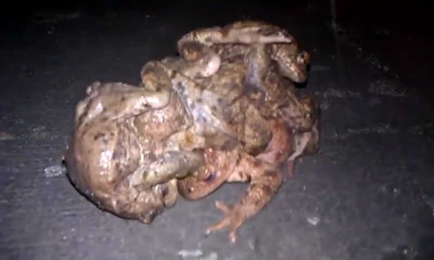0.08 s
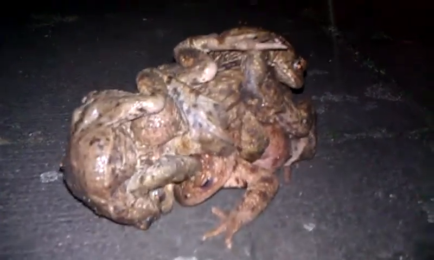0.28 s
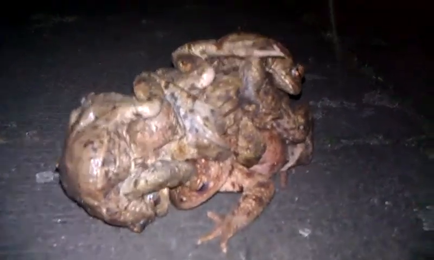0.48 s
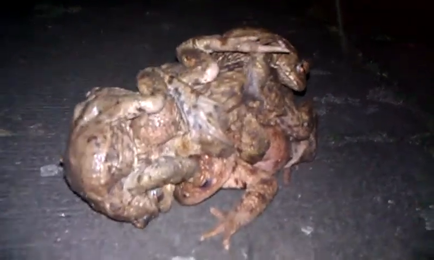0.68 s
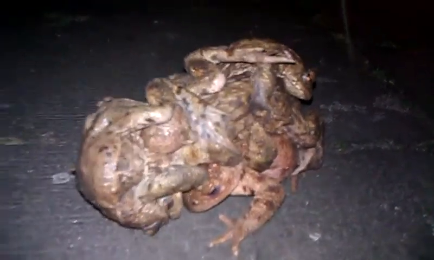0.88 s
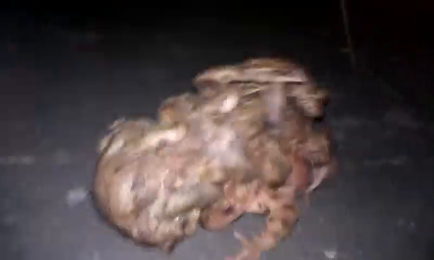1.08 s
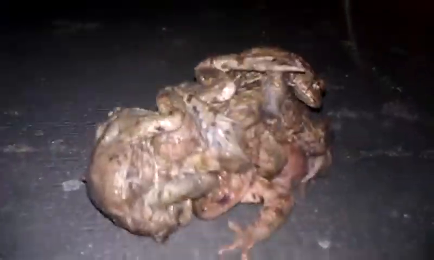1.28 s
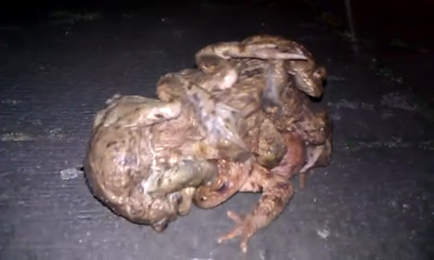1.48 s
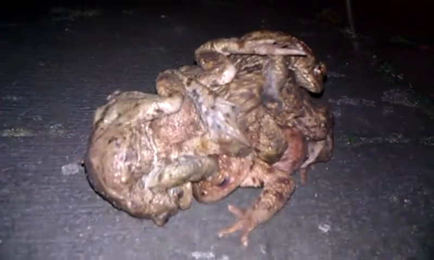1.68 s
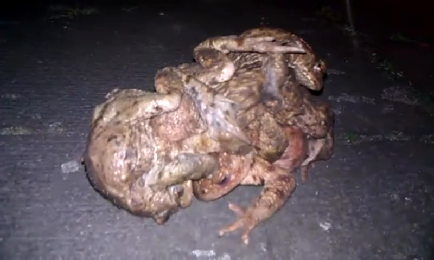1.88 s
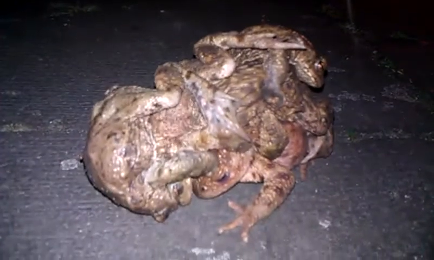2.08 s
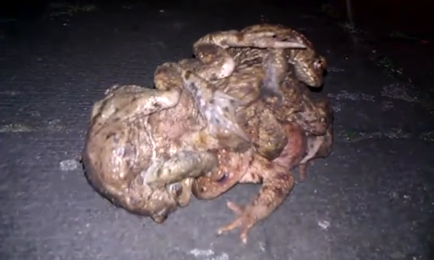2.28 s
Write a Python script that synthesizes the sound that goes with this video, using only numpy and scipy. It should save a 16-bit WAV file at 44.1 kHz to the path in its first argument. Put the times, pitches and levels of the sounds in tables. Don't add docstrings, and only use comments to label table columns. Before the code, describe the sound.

First a crisp cloth swish close to the phone, then a short toad chirp with sharp fabric cracks, and two more stuttering chirps, outdoors on a quiet night with faint engine hum and hiss.

```python
import sys
import numpy as np
from scipy import signal
from scipy.io import wavfile
from scipy.ndimage import uniform_filter1d

SR = 44100
rng = np.random.default_rng(int(sys.argv[2]) if len(sys.argv) > 2 else 0)


def materialize(psi):
    bounded = np.clip(np.atleast_2d(psi).T, -1, 1)
    quanta = np.round(bounded * 32767).astype(np.int16)
    wavfile.write(sys.argv[1], SR, quanta)


def ratio(d):
    e = np.asarray(d, float) / 20
    return 10 ** e


N = 101430

# frequency in Hz, level in dB per Hz.
NIGHT_AIR = [(25, -36), (60, -7.5), (130, -11), (370, -16.5), (1160, -17.5), (1900, -25), (8000, -33),
             (16000, -35)]
# time in seconds, level in dB.
ENGINE_HUM = [(0, -65), (.8, -65), (1.35, -60), (1.5, -59), (1.9, -63.5), (2.3, -69)]
# start in seconds, length in seconds, level in dB, pitch in Hz.
FAR_CALLS = [
    (0.661, 0.24, -65, 1535),
    (1.855, 0.014, -56.5, 1300),
    (2.095, 0.015, -56, 1100),
]
# time in seconds, level in dB, brightness in dB.
SWISH_PATH = [(.212, -55.5, -6), (.229, -43, -5), (.233, -26.5, -2), (.246, -24, 3.5), (.268, -35, -5),
              (.339, -45, -11), (.479, -40.5, -3.5), (.6, -50, -28), (.65, -77, -4)]
# time in seconds, level in dB, brightness in dB.
SHIFT_PATH = [(.79, -63, -38), (.807, -53.5, -35), (.810, -45, -33), (.832, -61, -33), (.865, -59.5, -33),
              (.89, -46.5, -33), (.898, -37.5, -29), (.918, -45.5, -33), (.94, -47, -33)]
# time in seconds, level in dB, brightness in dB.
TUG_PATH = [(.955, -58, -25), (.972, -34.5, -20), (.985, -43.5, -32), (.994, -41, -33), (1.005, -54, -25),
            (1.07, -75, -25)]
# frequency in Hz, width in Hz, level in dB.
WEAVE_RINGS = [(3320, 1210, -14), (5720, 960, 0), (6500, 1330, -1), (7880, 2500, -12), (11520, 2350, -11)]
# frequency in Hz, width in Hz, level in dB.
FOLD_RINGS = [(3700, 2600, -2.5), (5000, 2600, 7), (6470, 1400, 7), (8800, 1200, -6)]
# frequency in Hz, width in Hz, level in dB.
SHEEN_RINGS = [(3500, 140, -6.5), (7520, 1700, 13.5), (10500, 1400, -21), (12970, 2300, 8.5),
               (14060, 1900, 2.5)]
# time in seconds, peak in dB, centre in Hz, low thump in dB.
CLOTH_SNAPS = [
    (0.2136, -31.5, 5560, -40),
    (0.2314, -16.5, 5700, -39),
    (.72, -46, 5000, -33),
    (0.809, -43, 6200, -40),
    (0.9693, -18, 6500, -30.5),
    (0.9863, -25, 5740, -36),
    (0.99, -10, 5540, -23),
]
# start in seconds, held time in seconds, level in dB, pitch in Hz,
# share of the pitch by which it starts sharp.
CORD_BURSTS = [(0.921, 0.0012, -22, 1148, 0.22), (0.929, 0.0035, -24, 1158, 0.083),
               (0.9369, .045, -23, 1085, 0.03), (1.2737, 0.00017, -21.5, 1140, 0.44),
               (1.281, 0.0008, -23.5, 1280, 0.26), (1.289, 0.0014, -20.5, 1156, 0.14),
               (1.2971, 0.0024, -20.5, 1161, 0.13), (1.304, 0.0035, -21.5, 1144, 0.04),
               (1.3108, .042, -21, 1084, 0.082), (1.989, 0.0002, -18.5, 1215, 0.18),
               (1.995, 0.0009, -19, 1120, 0.14), (2.0023, 0.0033, -21, 1157, 0.13),
               (2.009, .035, -20, 1104, 0.12)]
# frequency in Hz, level in dB.
THROAT_CURVE = [(2200, -18), (4400, -21.5), (7500, -33), (9700, -32), (10800, -18), (11900, -33),
                (13500, -21), (15200, -15)]


def unit(x):
    return x / np.sqrt(np.mean(x ** 2))


def ring(x, hz, width):
    centre = min(hz, 0.45 * SR)
    b, a = signal.iirpeak(centre, max(hz / width, 0.3), fs=SR)
    return signal.lfilter(b, a, x)


def ring_twice(x, hz, width):
    return ring(ring(x, hz, width), hz, width)


def walk(rate, n=N):
    k = max(int(SR / rate), 1)
    held = np.repeat(rng.standard_normal(n // k + 1), k)
    return 2.03 * uniform_filter1d(uniform_filter1d(held, k), k)[:n]


def add(out, s, x):
    i = int(s * SR)
    out[i:i + len(x)] += x[:N - i]


def night():
    air = 0
    air_hz, air_db = np.array(NIGHT_AIR).T
    for hz in 35 * 2 ** np.arange(0, 9.4, 0.5):
        per_hz = np.interp(np.log(hz), np.log(air_hz), air_db)
        db = per_hz + 10 * np.log10(hz) + 1.35 * walk(6.96)
        air = air + ratio(db) * unit(ring_twice(rng.standard_normal(N), hz, hz / 2))
    hum_s, hum_db = np.array(ENGINE_HUM).T
    hum_level = ratio(np.interp(np.arange(N) / SR, hum_s, hum_db))
    hum = hum_level * unit(ring(rng.standard_normal(N), 56, 9.8))
    hiss = ratio(-68) * unit(ring(rng.standard_normal(N), 5900, 1470))
    return ratio(-57) * unit(air) + hum + hiss


def far_toads():
    out = np.zeros(N)
    for s, length, db, hz in FAR_CALLS:
        n = int(length * SR)
        note = unit(ring_twice(rng.standard_normal(n), hz, 45))
        add(out, s, ratio(db) * np.sqrt(np.hanning(n)) * note)
    return out


def cloth_tone(clicks, resonances):
    tone = 0
    for hz, width, db in resonances:
        flicker = ratio(db + 1.2 * walk(150))
        tone = tone + flicker * ring_twice(clicks, hz, 0.98 * width)
    return unit(tone)


def sleeve(path, weave, clicks_per_s):
    t = np.arange(N) / SR
    s, db, bright_db = np.array(path).T
    struck = rng.random(N) < clicks_per_s / SR
    grain = ratio(2.0 * rng.exponential(size=N))
    clicks = struck * grain * rng.standard_normal(N)
    no_lows = signal.butter(6, 2300, "high", fs=SR, output="sos")
    clicks = signal.sosfilt(no_lows, clicks)
    level = ratio(np.interp(t, s, db, -120, -120))
    bright = ratio(np.interp(t, s, bright_db))
    return level * (cloth_tone(clicks, weave) + bright * cloth_tone(clicks, SHEEN_RINGS))


def snaps():
    SNAP_S, THUMP_HZ, THUMP_S = 0.0015, 500, 0.003
    out = np.zeros(N)
    t = np.arange(SR // 30) / SR
    for s, db, hz, thump_db in CLOTH_SNAPS:
        burst = rng.standard_normal(len(t)) * np.exp(-t / SNAP_S)
        width = 0.43 * hz
        edge = ratio(-31) * np.diff(burst, prepend=0)
        crack = ring(ring(burst, hz, width), hz, 2 * width) + edge
        thump = 2 * t / THUMP_S * np.exp(-2 * t / THUMP_S)
        knock = ratio(thump_db) * thump * np.sin(2 * np.pi * THUMP_HZ * t)
        add(out, s, ratio(db) * (crack / np.abs(crack).max() + 3 * knock))
    return out


def toad():
    KICK_S, SAG_HZ_PER_S, JITTER = 0.0023, 850, 0.004
    ATTACK_S, SOFT_ATTACK_S = 0.00127, 0.00374
    RELEASE_DB_PER_S, FADE_DB, FADE_S = 6998, 11, 0.048
    STUTTER, STUTTER_AT_S, STUTTER_S = 0.3, 0.0056, 0.0012
    EFFORT, FULL_DB, OVERTONE_FADE_DB, OVERTONE_WOBBLE_DB = 1.2, -18.5, 2.8, 1.0
    PUFF_DB, PUFF_S, BREATH_DB, BREATH_S = -2, 0.00043, -22.5, 0.025
    LEAK_DB, LEAK_S = -22.5, 0.0017
    out = np.zeros(N)
    t = np.arange(SR // 14) / SR
    throat_hz, throat_db = np.array(THROAT_CURVE).T
    for s, held, db, hz, kick in CORD_BURSTS:
        sharp = kick > 0.03
        sag = SAG_HZ_PER_S * t * (1 if sharp else 0.3)
        f = hz * (1 + kick * np.exp(-t / KICK_S)) - sag
        f = f * (1 + JITTER * walk(580, n=len(t)))
        phase = 2 * np.pi * np.cumsum(f) / SR

        tired = (t / FADE_S) ** (1.3 if sharp else 3.0)
        shut_db = RELEASE_DB_PER_S * np.maximum(t - held - ATTACK_S, 0)
        swell = np.minimum(t / (ATTACK_S if sharp else SOFT_ATTACK_S), 1) ** 1.85
        stutter = STUTTER * sharp * np.exp(-((t - STUTTER_AT_S) / STUTTER_S) ** 2)
        env = swell * ratio(db - FADE_DB * tired - shut_db) * (1 - stutter)

        note = np.sin(phase)
        bright_db = EFFORT * (db - FULL_DB)
        for k in range(2, 15):
            fade_db = OVERTONE_FADE_DB * k * (t / FADE_S) ** 2 + shut_db
            fade_db = fade_db - OVERTONE_WOBBLE_DB * walk(570, n=len(t))
            level_db = np.interp(k * f, throat_hz, throat_db) + bright_db - fade_db
            note = note + ratio(level_db) * np.sin(k * (phase - 1))

        air = rng.standard_normal(len(t))
        air = ratio(bright_db) * (air + 2 * ring(air, 15700, 2100))
        puff = ratio(PUFF_DB) * np.exp(-t / PUFF_S)
        breath = ratio(BREATH_DB) * np.exp(-t / BREATH_S)
        add(out, s, env * (note + air * (puff + breath)))
        leak = (air * np.exp(-t / LEAK_S))[::-1]
        add(out, s + ATTACK_S - t[-1], ratio(db + LEAK_DB) * leak)
    return out


def scene():
    cloth = sleeve(SWISH_PATH, WEAVE_RINGS, 16000)
    cloth = cloth + sleeve(SHIFT_PATH, FOLD_RINGS, 5000)
    cloth = cloth + sleeve(TUG_PATH, FOLD_RINGS, 5000)
    cloth = cloth + snaps()
    duck = 1 / (1 + 9.0 * uniform_filter1d(np.abs(cloth), size=2000, origin=900))
    mid = duck * night() + far_toads() + cloth + toad()
    during_swish = np.abs(np.arange(N) / SR - 0.25) < 0.02
    side = ratio(-25) * ring(np.roll(cloth, 90), 9800, 3300) * during_swish
    return np.array([mid + side, mid - side])


def roll_off(x):
    return signal.sosfilt(signal.butter(12, 16950, fs=SR, output="sos"), x)


def record(dry):
    top_cut = signal.ellip(8, 0.2, 60, 16050, fs=SR, output="sos")
    mix = signal.sosfilt(top_cut, dry)
    return roll_off(mix)


dry = scene()
out = record(dry)
materialize(out)
```